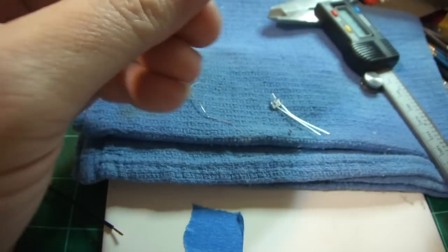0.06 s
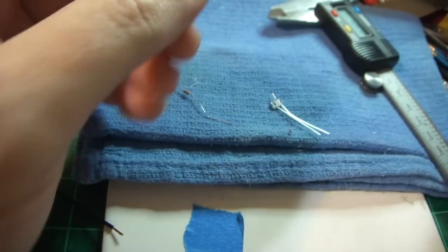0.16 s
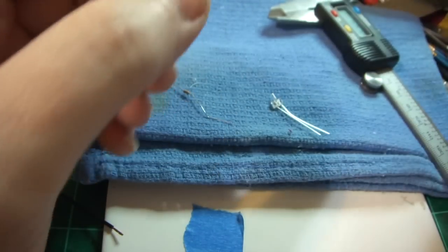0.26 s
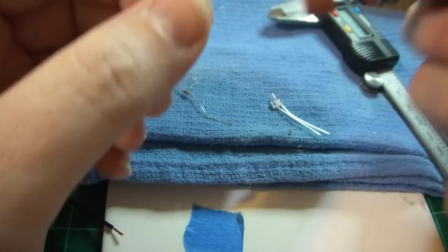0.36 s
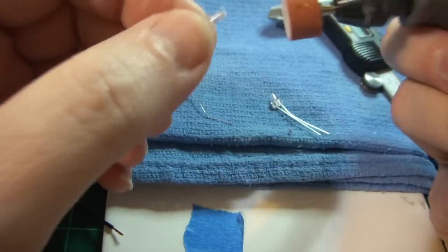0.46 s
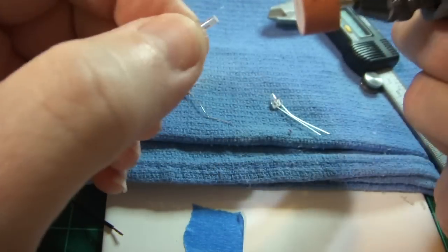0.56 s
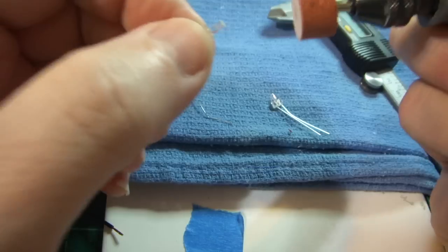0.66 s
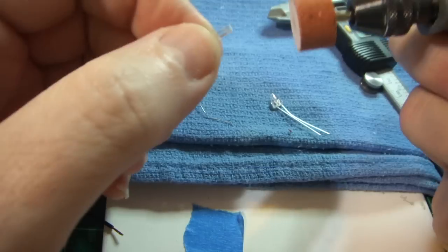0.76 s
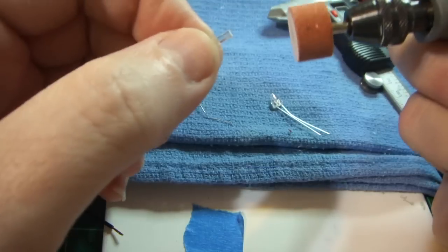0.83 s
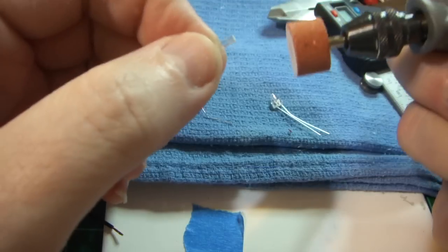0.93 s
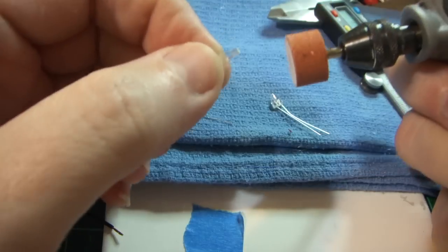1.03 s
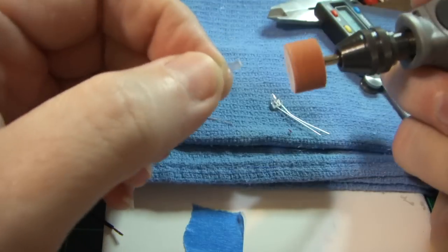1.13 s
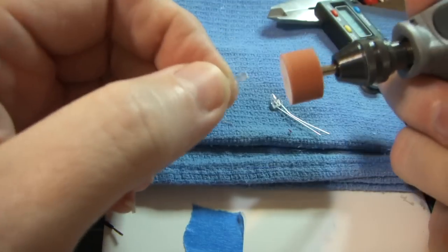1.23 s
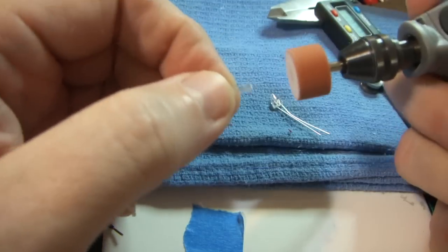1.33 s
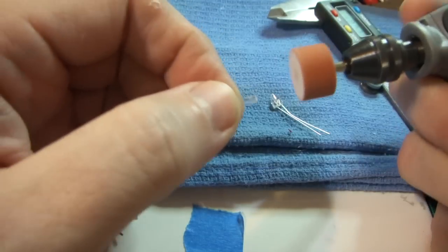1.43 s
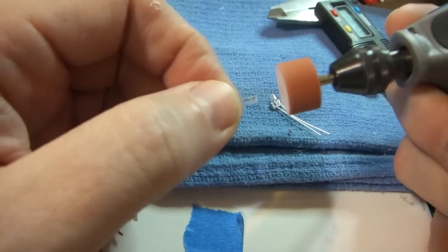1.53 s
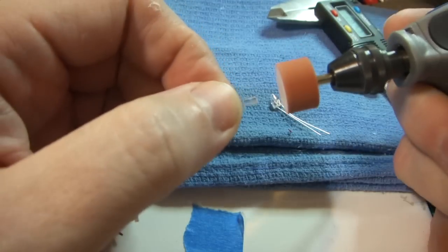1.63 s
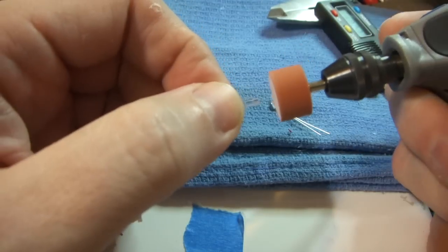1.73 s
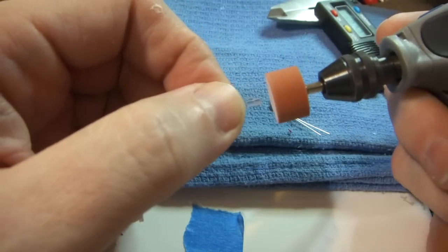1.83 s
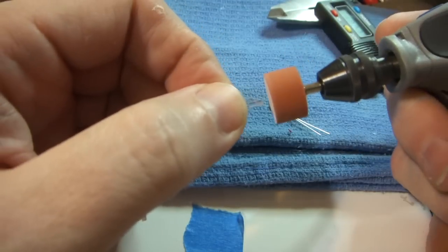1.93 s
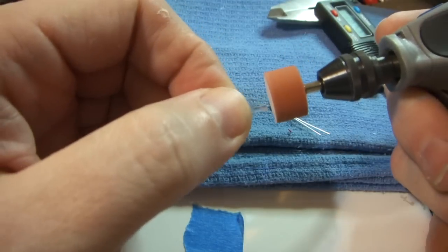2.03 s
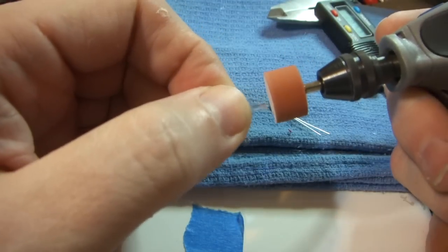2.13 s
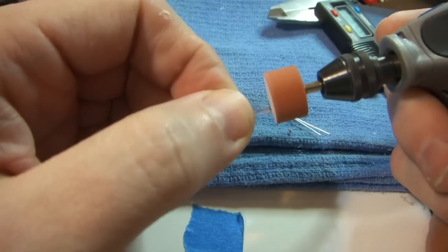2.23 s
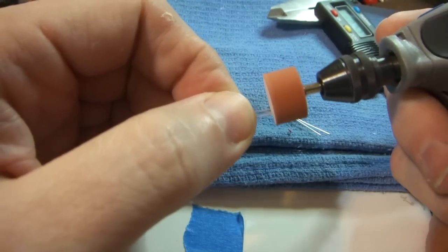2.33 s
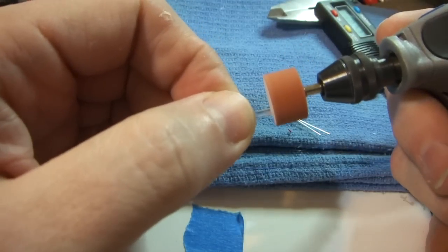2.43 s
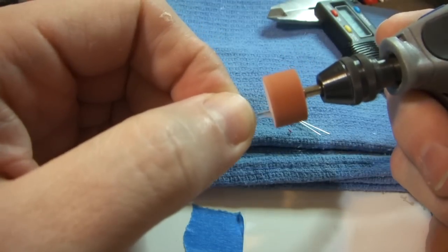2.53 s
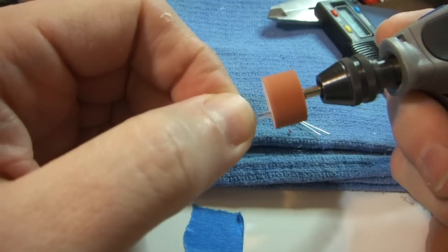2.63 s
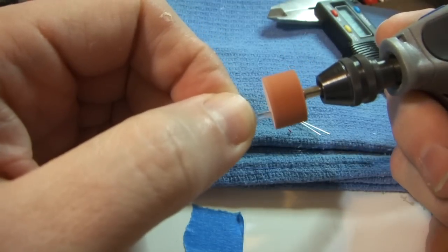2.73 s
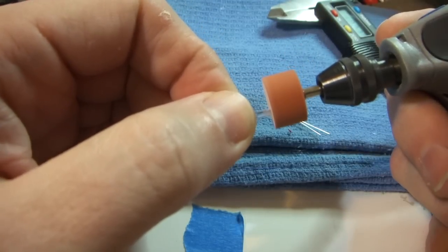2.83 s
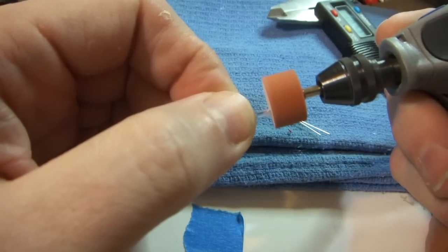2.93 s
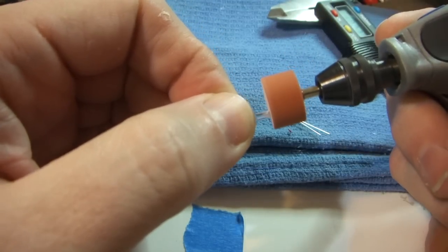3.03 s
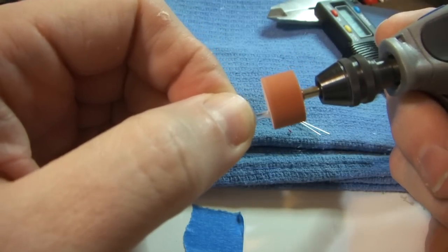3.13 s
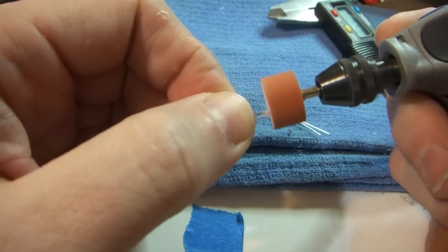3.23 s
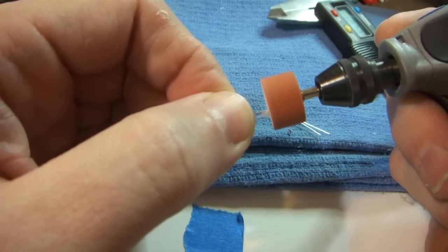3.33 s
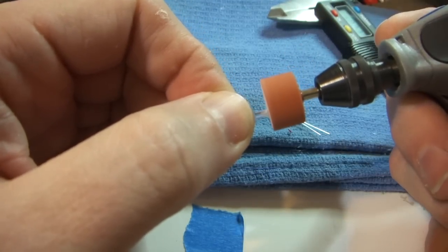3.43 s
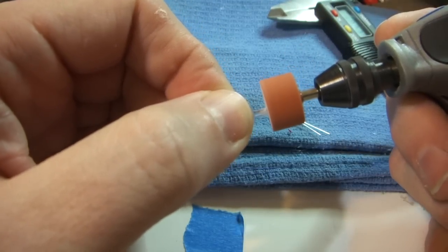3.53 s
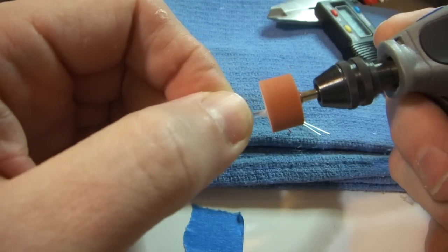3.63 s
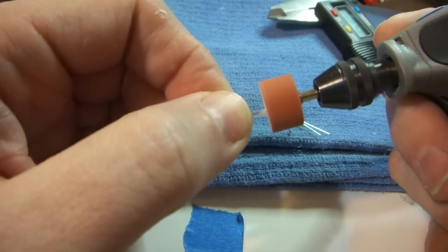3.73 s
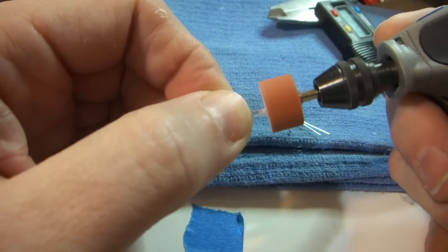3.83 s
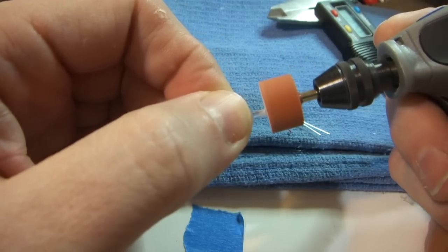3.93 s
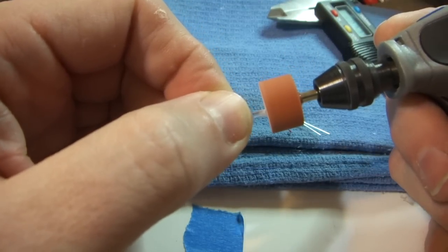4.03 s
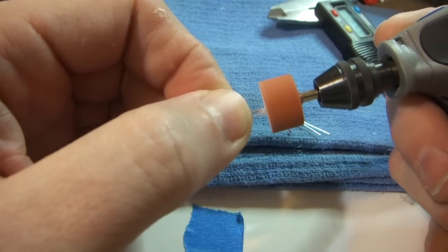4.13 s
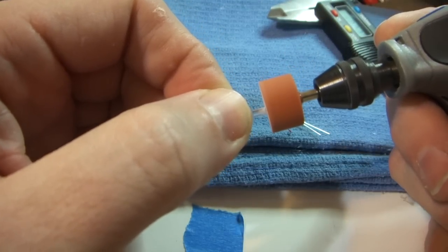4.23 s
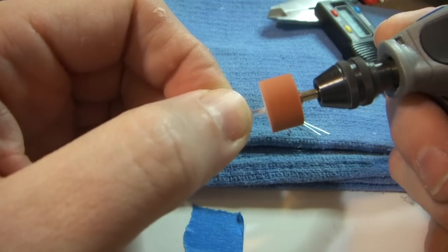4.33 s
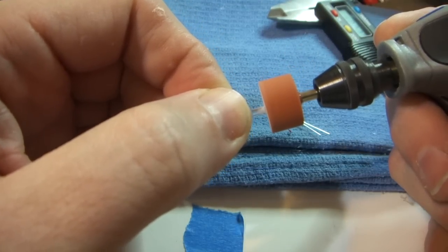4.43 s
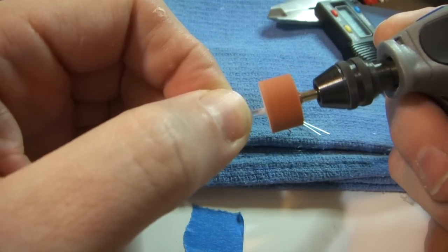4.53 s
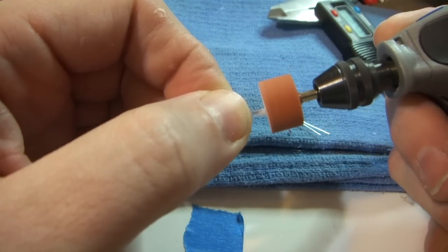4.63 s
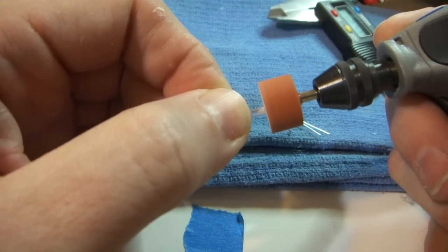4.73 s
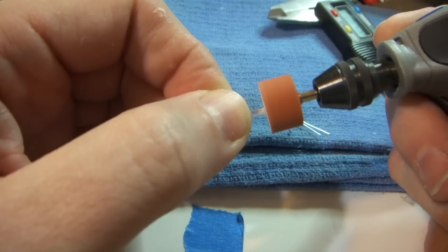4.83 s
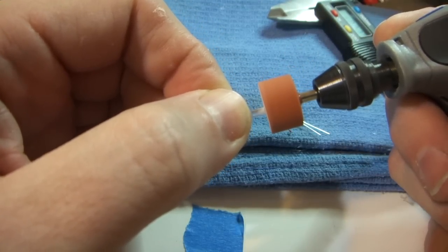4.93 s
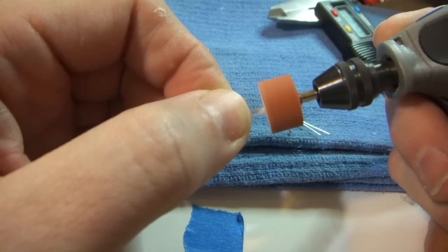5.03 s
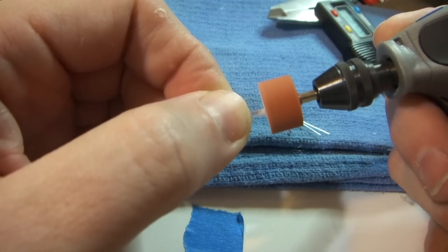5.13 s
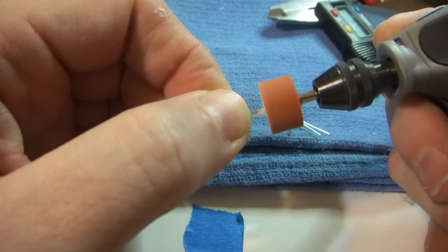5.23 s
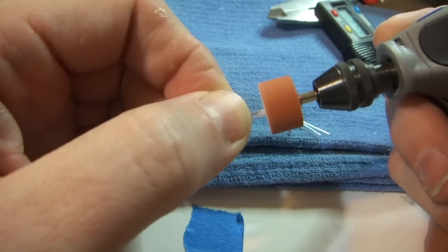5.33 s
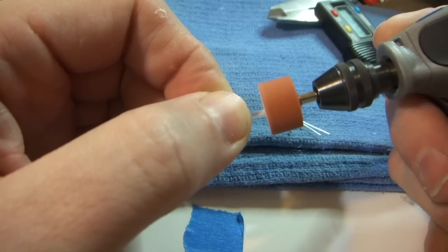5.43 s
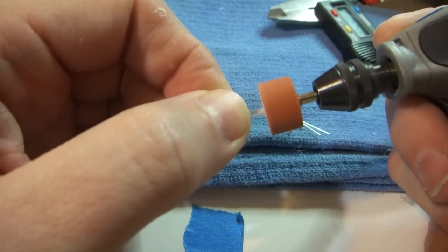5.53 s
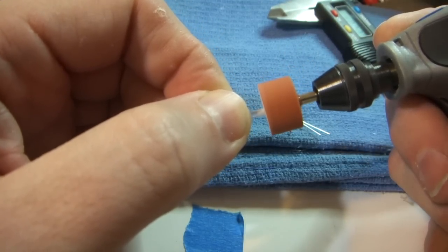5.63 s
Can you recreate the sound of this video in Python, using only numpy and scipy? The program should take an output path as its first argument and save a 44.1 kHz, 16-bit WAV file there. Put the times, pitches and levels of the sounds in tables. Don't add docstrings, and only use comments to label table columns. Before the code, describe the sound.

Small electric tool snaps on, spins up to a steady thin whine, then its abrasive stone rasps and squeals against a thin plastic piece.

```python
import sys
import numpy as np
from scipy import signal
from scipy.fft import rfft, irfft, next_fast_len
from scipy.io import wavfile
from scipy.ndimage import uniform_filter1d

SR = 44100
rng = np.random.default_rng(int(sys.argv[2]) if len(sys.argv) > 2 else 0)


def magnitude_from_level(level_db):
    exponent = np.asarray(level_db, float) / 20
    return 10 ** exponent


def int16_out(signal):
    q = np.round(np.clip(np.atleast_2d(signal).T, -1, 1) * 32767)
    wavfile.write(sys.argv[1], SR, q.astype(np.int16))


N = 250047
FREE_SPEED = 95.94

# t/s, f/Hz
CHOP = [(1.05, 1012), (1.11, 1044), (1.17, 1076), (1.23, 1100.6), (1.29, 1123), (1.41, 1163.3),
        (1.53, 1200.5), (1.65, 1235), (1.71, 1252.6)]


def rms_one(x):
    return x / np.sqrt(np.mean(x ** 2) + 1e-20)


def in_time(rows):
    s, *columns = np.transpose(rows)
    return [np.interp(np.arange(N) / SR, s, c) for c in columns]


def at_hz(points):
    size = next_fast_len(N)
    hz = np.maximum(np.arange(size // 2 + 1) * SR / size, 1)
    table_hz, values = np.array(points).T
    return np.interp(np.log(hz), np.log(table_hz), values)


def shaped(x, response):
    size = next_fast_len(N)
    return irfft(rfft(x, size) * response, size)[..., :N]


def drift(rate):
    return np.interp(np.arange(N) * (min(rate, 100) / SR), np.arange(600), 1.2 * rng.standard_normal(600))


def ring(clicks, hz, t60):
    r = magnitude_from_level(-60 / (t60 * SR))
    w = 2 * np.pi * hz / SR
    return signal.lfilter([0, np.sin(w)], [1, -2 * r * np.cos(w), r * r], clicks + 1e-18)


def worn_pattern(turns, repeat):
    surface = rng.standard_normal(460)
    recurring = np.interp(turns % 1 * 459, np.arange(460), surface)
    repeat = np.clip(repeat, 0, 1)
    return np.sqrt(repeat) * rms_one(recurring) + np.sqrt(1 - repeat) * rng.standard_normal(N)


def gestures(starts, lengths, levels_db, attack, release):
    t, power = np.arange(N) / SR, 1e-12
    for s, length, db in zip(starts, lengths, levels_db):
        rise = np.clip((t - s) / attack, 0, 1)
        decay = np.exp(-np.maximum(t - s - length, 0) / release)
        power = power + (magnitude_from_level(db) * rise * decay) ** 2
    return np.sqrt(power)


def reflections(x, t60):
    t = np.arange(SR // 10) / SR
    tails = rng.standard_normal((2, len(t))) * magnitude_from_level(-60 * t / t60) * (t > .002)
    tails /= np.sqrt(np.sum(tails ** 2, axis=1, keepdims=True))
    return signal.fftconvolve(x[None], tails, axes=1)[:, :N]


def room_tone():
    # f/Hz, level/dB (per Hz)
    spectrum = [(15, -33), (25, -35), (90, -11.5), (113, -4.5), (303, -3), (344, -0.5), (555, -9.5),
                (715, -2), (897, -10), (1450, -11), (1770, -15), (2060, -14), (2650, -17.5), (4280, -19.5),
                (10300, -33), (13400, -83), (22000, -120)]
    # f/Hz, correlation [0..1]
    likeness = [(60, 0.86), (170, 0.9), (460, 0.83), (1280, 0.66), (3560, 0.3), (9890, 0.17)]
    alike = np.clip(at_hz(likeness), 0, .99)
    colour = magnitude_from_level(at_hz(spectrum))
    mid, side = rng.standard_normal((2, N))
    mid = shaped(mid, colour * np.sqrt(1 + alike))
    side = shaped(side, colour * np.sqrt(1 - alike))
    return magnitude_from_level(-40.5) * rms_one(mid + side * [[1], [-1]])


def cloth():
    # f/Hz, level/dB (per Hz)
    spectrum = [(590, -35), (1000, -32.5), (1980, -9), (2340, -8), (3080, -14), (3360, -11.5),
                (4290, -14.5), (7420, -14.5), (10300, -19.5), (13400, -62), (22000, -120)]
    # t/s (start), duration/s, level/dB
    strokes = [
        (0.044, 0.13, -48),
        (0.151, 0.16, -38),
        (0.406, .012, -48),
        (0.483, 0.09, -49),
    ]
    fibres = rng.standard_normal((2, N)) * magnitude_from_level(2.5 * drift(90))
    level = gestures(*np.transpose(strokes), attack=.015, release=.0099)
    return level * rms_one(shaped(fibres[0] + 0.76 * fibres[1] * [[1], [-1]], magnitude_from_level(at_hz(spectrum))))


def clicks():
    # t/s, level/dB (peak), f/Hz (main ring), upper ring level/dB, top ring level/dB
    impacts = [
        (0.419, -28.5, 4370, -6, 2),
        (.5493, -12.5, 3640, 6, -7),
        (.905, -43, 5650, 10, -4),
        (0.9734, -4, 4200, -8, -22),
        (1.198, -33, 3600, 8, -3),
    ]
    # t/s (delay), level/dB
    echoes = [(.0008, -4), (.0022, -10), (.0043, -20), (.0089, -23), (.021, -29)]
    # t/s, level/dB (peak), f/Hz
    thumps = [(1.314, -28, 343)]
    out = np.zeros(N)
    for s, db, hz, upper_db, top_db in impacts:
        snap = magnitude_from_level(db) * (np.arange(N) == round(s * SR))
        out += magnitude_from_level(upper_db) * ring(snap, 1.46 * hz, .003)
        out += magnitude_from_level(top_db) * ring(snap, 7200, .002)
        for delay, echo_db in echoes:
            snap[round((s + delay) * SR)] = magnitude_from_level(db + echo_db)
        out += ring(ring(snap, hz, .0026), hz, .0026) * .16
    out = signal.sosfilt(signal.butter(2, [2500, 8200], "band", fs=SR, output="sos"), out)
    for s, db, hz in thumps:
        knock = signal.lfilter([.1], [1, -.9], magnitude_from_level(db) * (np.arange(N) == round(s * SR)))
        out += ring(knock, hz, 0.064) + 0.63 * ring(knock, 1.74 * hz, .06)
    return out


def standby():
    # f/Hz, bandwidth/Hz, level/dB (rms)
    bands = [(2050, 98, -53), (4200, 260, -55), (6270, 180, -61)]
    out, white = 0, rng.standard_normal(N)
    for hz, width, db in bands:
        t60 = np.log(1000) / (np.pi * width)
        out = out + magnitude_from_level(db) * rms_one(ring(white, hz, t60))
    return out * np.interp(np.arange(N) / SR, [.45, .55, 1.05, 1.1], [0, 1, 1, 0])


def free_speed():
    zero_throttle_hz, lag_s, breakaway_s = 941, .192, 1.083
    chop = in_time(CHOP)[0]
    throttle = (chop - zero_throttle_hz) / (chop[-1] - zero_throttle_hz)
    aim = FREE_SPEED * throttle * (np.arange(N) > breakaway_s * SR)
    r = np.exp(-1 / (lag_s * SR))
    return signal.lfilter([1 - r], [1, -r], aim)


def loaded_speed():
    # t/s, loss/(turns per s)
    drag = [(2.62, 0.0), (2.8, 0.88), (2.92, 3.24), (3.04, 4.32), (3.16, 3.9), (3.28, 5.34), (3.52, 9.64),
            (3.64, 11.21), (3.76, 11.84), (3.88, 11.07), (4.12, 10.67), (4.48, 13.57), (4.6, 16.1),
            (4.72, 16.85), (5.08, 18.8), (5.32, 20.67), (5.44, 22.48), (5.67, 26.67)]
    return free_speed() - in_time(drag)[0]


def whine(turns, speed):
    # chopper multiple, shaft multiple, level/dB (standstill), level/dB (free speed)
    lines = [(1, -3, -56.5, -58.5), (1, 0, -59.5, -61), (1, 3, -51.5, -52.5), (2, -3, -73, -67),
             (2, 0, -63.5, -53.5), (2, 3, -63.5, -60.5), (3, -3, -61, -54.5), (3, 0, -62, -74),
             (3, 3, -59, -46.5), (4, -3, -65, -70.5), (4, 0, -66.5, -59), (4, 3, -82, -71),
             (5, -3, -77, -61.5), (5, 0, -54.5, -56), (5, 3, -58, -65), (6, 0, -57.5, -53.2),
             (7, 0, -51, -57), (8, 0, -50, -69.5), (0, 9, -63, -52), (0, 12, -69.5, -82.5),
             (0, 15, -52, -65), (1, 6, -90, -70.5), (2, -6, -87, -75.5)]
    unbalance = (-0.5, 1, -87, -60)
    # f/Hz, bandwidth/Hz, lift level/dB
    housing = [(765, 190, 11), (1016, 251, 17.7), (1200, 530, 7.5), (1437, 480, 9.5), (1997, 680, 25.5),
               (2277, 150, 9.5), (2779, 61, 16.5), (3140, 360, 14), (3291, 590, 9.5), (4140, 150, 16),
               (4555, 310, 22), (5440, 296, 18), (5960, 396, 13.5), (6440, 311, 13.5)]
    bar_onset_s, bar_swell_s, stall_db = 1.079, 0.072, -15
    small_body_hz, small_body_slope = 670, 16
    t = np.arange(N) / SR
    coarse = slice(None, None, 64)
    chop_hz = in_time(CHOP)[0]
    chop = np.cumsum(chop_hz) / SR
    run_up = free_speed()[coarse] / FREE_SPEED
    moving = 1 - np.exp(-np.maximum(t - bar_onset_s, 0) / bar_swell_s)
    out = 0
    for chop_order, shaft_order, still_db, free_db in lines + [unbalance]:
        k, j = round(chop_order), round(shaft_order)
        hz = (k * chop_hz + j * speed)[coarse]
        db = still_db + (free_db - still_db) * run_up
        db = db + sum(lift / (1 + (2 * (hz - c) / w) ** 2) for c, w, lift in housing)
        if j != 1:
            db = db - small_body_slope * np.log2(np.maximum(small_body_hz / (hz + 1), 1))
        level = magnitude_from_level(np.interp(t, t[coarse], db) + .7 * drift(7))
        level = level * (moving if j else magnitude_from_level(stall_db * (1 - moving) * (k == 1)))
        cycles = k * chop + j * turns + rng.random()
        wander = .2 * drift(8) + .07 * k * drift(50)
        out = out + level * np.sqrt(2) * np.sin(2 * np.pi * cycles + wander)
    return out * np.clip((t - 1.054) / 0.0065, 0, 1)


def brushes(turns):
    # f/Hz, level/dB (per Hz)
    spectrum = [(290, -65), (500, -17), (789, -15), (851, -11.5), (1340, -12.5), (1560, -11.5),
                (1730, -11.5), (2630, -19), (2870, -17), (3020, -14), (4150, -14.5), (9340, -16),
                (10300, -21.5), (13400, -60), (22000, -120)]
    # t/s, level/dB
    loudness = [(1.05, -59), (1.1, -44.5), (1.3, -35.5), (1.7, -30.5), (2.2, -29.5), (2.7, -29.5),
                (4.0, -28), (5.67, -32)]
    hiss = rms_one(shaped(worn_pattern(turns, repeat=.2), magnitude_from_level(at_hz(spectrum))))
    return hiss * magnitude_from_level(in_time(loudness)[0]) * (np.arange(N) > 1.05 * SR)


def contact():
    # t/s (start), duration/s, bending squeal level/dB, tip chatter level/dB
    presses = [(2.691, 0.023, -19, -43.5), (2.752, 0.029, -21, -40.5), (2.817, 0.064, -24, -27.5),
               (2.865, 0.053, -25, -37.5), (2.918, 0.039, -23.5, -32.5), (2.994, 0.023, -20, -42.5),
               (3.029, 0.043, -17, -41.5), (3.101, 0.063, -12.5, -41), (3.202, 0.07, -20, -31),
               (3.254, 0.034, -7, -23.5), (3.331, 0.062, -24.5, -28.5), (3.372, 0.1, -17, -28),
               (3.496, 0.087, -18.5, -24.5), (3.612, 0.12, -27.5, -26.5), (3.756, 0.067, -25, -57),
               (3.874, 0.057, -24.5, -23), (3.945, 0.077, -28.5, -32), (4.056, 0.11, -36, -26),
               (4.14, .11, -35.5, -21.5), (4.226, 0.24, -23, -26.5), (4.496, 0.087, -21.5, -22.5),
               (4.594, .1, -24.5, -31.5), (4.696, .19, -26, -22.5), (4.905, .07, -26.5, -24),
               (4.95, 0.16, -29, -21), (5.117, 0.12, -30, -32), (5.259, 0.078, -29.5, -17.5),
               (5.391, 0.035, -29, -20), (5.465, 0.13, -51.5, -18.5), (5.634, 0.013, -31.5, -25.5)]
    # t/s (from), f/Hz, level/dB (over the chatter)
    grips = np.array([(0, 6160, 0), (3.3, 6280, 4.5), (3.6, 7180, -1.5), (4.36, 7570, 2.5),
                      (4.49, 7400, -6.5), (4.96, 7800, 3), (5.11, 8340, -10.5), (5.48, 8830, -2.5)])
    # t/s, f/Hz
    bend = [(2.7, 1946), (2.76, 2060), (2.85, 1930), (3.05, 1890), (3.18, 1934), (3.29, 1944), (3.36, 2050),
            (3.56, 1920), (3.68, 1930), (3.8, 1974), (4.2, 1850), (4.32, 1936), (4.45, 1840), (4.54, 1920),
            (4.7, 1790), (4.9, 1885), (5.66, 1856)]
    # t/s, f/Hz
    wear = [(3.3, 2950), (3.6, 3080), (3.63, 3480), (4.455, 3500), (4.46, 4060), (4.58, 4200), (4.63, 4400),
            (4.72, 4200), (4.84, 4200), (4.9, 4380), (4.99, 4120), (5.08, 4050), (5.14, 4350), (5.28, 4220),
            (5.45, 4330), (5.56, 4250), (5.61, 4300), (5.67, 4750)]
    s, length, *levels = np.transpose(presses)
    bend_db, tip_db = [20 * np.log10(np.hypot(magnitude_from_level(rest), gestures(s, length, db, attack=.012, release=.028)))
                       for db, rest in zip(levels, (-35, -40))]
    top_hz, top_db = grips[np.searchsorted(grips[1:, 0], np.arange(N) / SR), 1:].T
    grit_db = -34.5 + 0.41 * (tip_db + 28) + 0.25 * (bend_db + 22)
    return bend_db, in_time(bend)[0], tip_db, in_time(wear)[0], tip_db + top_db, top_hz, grit_db


def grinding(turns, speed):
    # f/Hz, level/dB (per Hz)
    spectrum = [(700, -39.5), (1300, -14), (2300, -14), (3000, -18), (3800, -13.5), (4500, -8.5),
                (5300, -21), (6300, -11.5), (7000, -18.5), (7700, -11.5), (8700, -12.5), (9600, -10),
                (10300, -2), (13400, -35)]
    bend_db, bend_hz, tip_db, tip_hz, top_db, top_hz, grit_db = contact()
    angle = turns + .729
    turn = np.floor(angle).astype(int)
    since = (angle - turn - .5) / np.maximum(speed, 1)
    luck = rng.standard_normal((600, 13))[turn].T
    modes = [(bend_db, bend_hz, .0013, .0005, .8, 1.3, .25, .003),
             (tip_db - 3, tip_hz, .0012, .0003, 1.05, 1, .45, .009),
             (top_db - 5, top_hz, .0008, .0002, 1.1, 1, 1.0, .015)]
    out = 0
    for k, (db, hz, width, late, before, after, phase_scatter, hz_scatter) in enumerate(modes):
        lag = since - late - 0.00059 * luck[6 + k]
        touch = np.exp(-.5 * (lag / (width * np.where(lag > 0, after, before))) ** 2)
        slip = phase_scatter * luck[k]
        detune = 1 + hz_scatter * luck[9 + k]
        squeal = rms_one(touch * np.sin(2 * np.pi * hz * detune * since + slip))
        out = out + squeal * magnitude_from_level(db + 0.5 * luck[3 + k])
    out = out + 0.06 * ring(out, 1848.0, 0.012) * 2 * np.pi * 1880 / SR
    touch = .07 + np.exp(-.5 * (since / .0011) ** 2) * magnitude_from_level(1.3 * luck[12])
    grit = rms_one(shaped(touch * worn_pattern(turns, repeat=0.75), magnitude_from_level(at_hz(spectrum))))
    out = out + grit * magnitude_from_level(grit_db + 11.5) + singing(angle)
    return out * np.clip((np.arange(N) / SR - 2.697) / 0.0031, 0, 1)


def singing(angle):
    # t/s (start), duration/s, level/dB (rms)
    tones = [(2.86, .1, -21), (3.173, .07, -25.5), (3.314, 0.14, -22.5), (3.445, 0.11, -19.5),
             (3.633, .12, -25), (3.76, 0.12, -27), (4.028, 0.059, -28), (4.196, .06, -26.5),
             (4.8, 0.094, -31)]
    slips_per_turn = 21
    level = gestures(*np.transpose(tones), attack=0.028, release=0.032) * magnitude_from_level(1.9 * drift(25.21))
    return level * np.sqrt(2) * np.sin(2 * np.pi * slips_per_turn * (angle - .5) + 0.31 * drift(20))


def scene():
    # f/Hz, level/dB (left over right)
    pan = [(60, -2), (110, 8), (190, 23), (330, 13), (580, -2), (1020, -5), (1800, 0.5), (3180, -1),
           (5610, -1), (9890, -2)]
    # f/Hz, phase/rad (left leads)
    lead = [(0, 0), (2240, -0.35), (3790, -1.4), (4740, 0.61), (5000, -1.33), (5600, -1.84), (6550, -0.87),
            (7320, 1), (8270, -1.39), (10100, -1.85)]
    speed = loaded_speed()
    turns = np.cumsum(speed) / SR
    tool = whine(turns, speed) + brushes(turns) + grinding(turns, speed) + standby()
    half = magnitude_from_level(at_hz(pan) / 2) * np.exp(.5j * at_hz(lead))
    close = np.array([shaped(tool, half), shaped(tool, 1 / half)])
    # f/Hz, level/dB
    scatter = [(500, -10), (1200, -14), (2500, -3.5), (5000, -10.5), (9000, -8.5)]
    scattered = shaped(tool, magnitude_from_level(at_hz(scatter)))
    snaps = clicks()
    close += snaps * magnitude_from_level(np.array([[-.6], [.6]]))
    close += reflections(scattered + magnitude_from_level(-22) * snaps, t60=.06)
    return close + cloth() + room_tone()


def band_limit(x):
    return signal.sosfilt(signal.butter(12, 15500, fs=SR, output="sos"), x)


def record(dry):
    loud_db = 10 * np.log10(uniform_filter1d(np.mean(dry ** 2, axis=0), SR // 25) + 1e-12)
    fall = 22 * np.arange(N) / SR
    held_db = np.maximum.accumulate(loud_db + fall) - fall
    ducked = dry * magnitude_from_level(-.45 * np.maximum(held_db + 17, 0))
    limited = .9 * np.tanh(ducked / .9)
    body = signal.sosfilt(signal.cheby2(16, 60, 10750, fs=SR, output="sos"), limited)
    hiss_band = signal.butter(3, [13400, 14100], "band", fs=SR, output="sos")
    hiss = signal.sosfilt(hiss_band, rng.standard_normal((2, N)))
    patches = np.clip(np.array([drift(30), drift(30)]) + (loud_db + 26) / 7, 0, 1.3)
    return band_limit(body + hiss * magnitude_from_level(-43) * patches)


dry = scene()
out = record(dry)
int16_out(out)
```